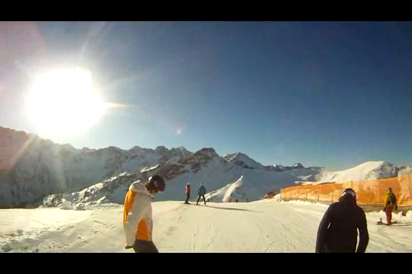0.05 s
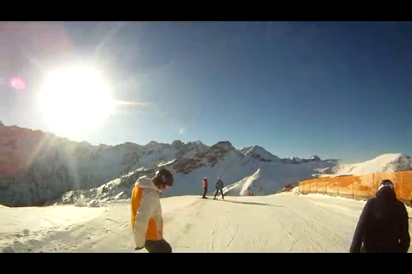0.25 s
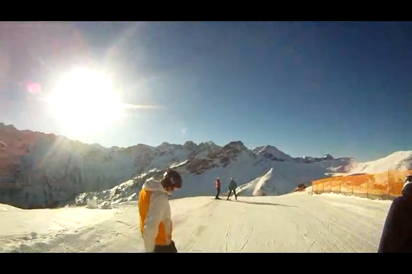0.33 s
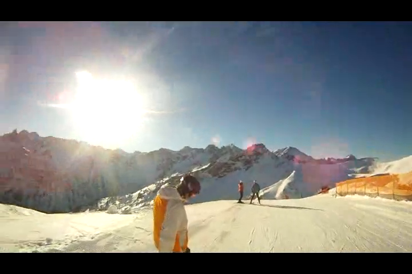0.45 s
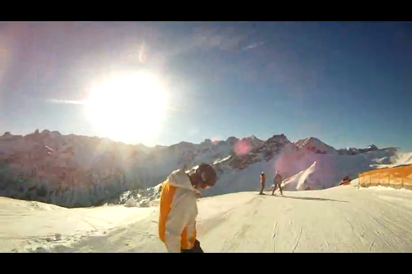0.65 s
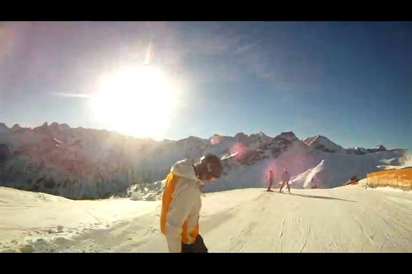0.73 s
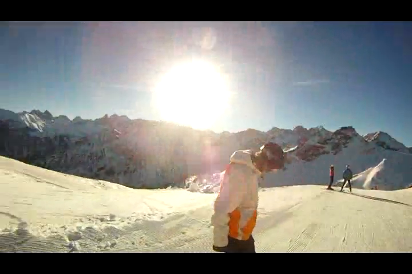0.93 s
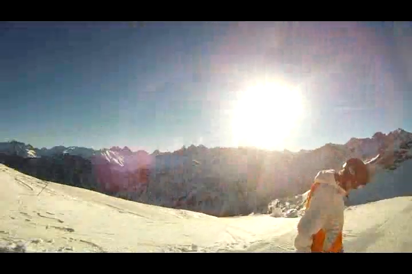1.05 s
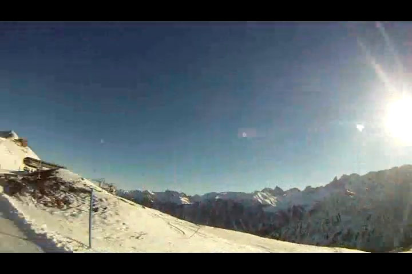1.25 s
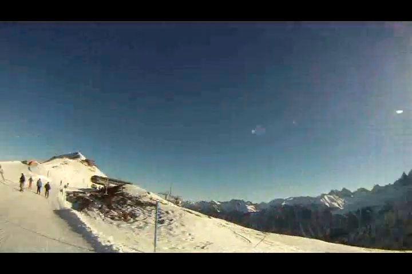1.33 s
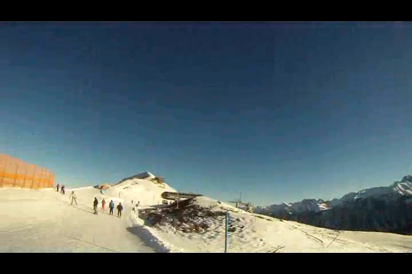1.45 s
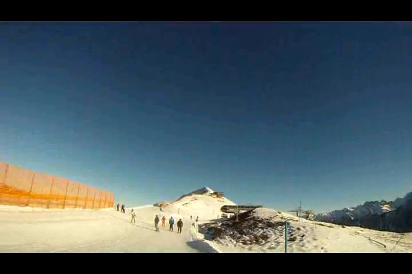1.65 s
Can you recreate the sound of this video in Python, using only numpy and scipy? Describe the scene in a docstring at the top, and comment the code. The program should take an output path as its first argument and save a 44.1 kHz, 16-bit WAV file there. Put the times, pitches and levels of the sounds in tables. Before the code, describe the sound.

Skis glide over packed snow with an uneven, grainy hiss. Gear knocks hard against the body-worn microphone twice, about a second apart, with a few light taps, while low wind gusts buffet it.

```python
"""On packed snow, skis glide along, heard from a small body-worn camera.
Friction and breaking crystals make a grainy hiss that excites the resonances of the plastic case.
Twice the gear knocks hard against the camera, a dull thump and then a crack; it also taps lightly.
Wind buffets the case. The recorder holds coarse samples and clips when it is overloaded."""
import sys
import numpy as np
from scipy import signal
from scipy.io import wavfile
from scipy.ndimage import uniform_filter1d

SR = 44100
rng = np.random.default_rng(int(sys.argv[2]) if len(sys.argv) > 2 else 0)


def file_out(sig):
    """Save sig as 16-bit WAV at sys.argv[1]."""
    # one column per channel
    cols = np.atleast_2d(sig).T
    # limit, then scale
    lim = np.clip(cols, -1, 1)
    pcm = np.round(lim * 32767).astype(np.int16)
    wavfile.write(sys.argv[1], SR, pcm)


N = 74970

# The course of the glide. Each row: time in seconds, then the relative levels in dB of the low middle,
# the case ring, the hiss and the thin upper ring.
GLIDE_LEVELS = [(0, -46, -38.5, -50.5, -55.5), (0.13, -43, -37, -44.5, -57), (0.2, -43, -28.5, -37.5, -53),
                (0.26, -41.5, -32.5, -41, -50), (0.32, -46, -39.5, -46.5, -54),
                (0.47, -43, -36.5, -45.5, -49.5), (0.56, -47.5, -37.5, -46, -51.5),
                (0.635, -49, -47, -53.5, -66), (0.73, -38.5, -35, -44.5, -60), (0.86, -40.5, -40, -45, -55),
                (0.91, -39.5, -40.5, -45, -61), (1.0, -39.5, -34.5, -42, -51.5),
                (1.08, -47.5, -42.5, -47, -67), (1.19, -34.5, -35, -38.5, -53),
                (1.24, -48.5, -42.5, -50, -67), (1.27, -46.5, -41, -48.5, -66),
                (1.325, -52.5, -48, -54.5, -71), (1.385, -46.5, -39.5, -48.5, -64),
                (1.42, -52.5, -51.5, -55.5, -68), (1.455, -51.5, -52.5, -53.5, -77),
                (1.54, -52, -42.5, -48, -68), (1.6, -54.5, -52, -57.5, -66.5),
                (1.69, -50.5, -52.5, -57.5, -62.5)]
# Resonances of the case, in four groups. Each row: frequency in Hz, bandwidth in Hz, relative gain in dB.
LOW_MODES = [(259, 137, 3.5), (440, 78, -6.5), (707, 210, -4.5), (901, 83, 1), (1307, 90, -13.5)]
CASE_MODES = [(1595, 59, 0), (2008, 218, 6.5)]
HISS_MODES = [(2650, 610, -0.5), (3230, 620, 5), (4630, 970, -12)]
UPPER_MODES = [(5350, 460, 0)]


def skis():
    """Source and filter: snow noise is heard as a broad slide and through the resonances of the case."""
    low_db, case_db, hiss_db, upper_db = in_time(GLIDE_LEVELS)
    slide = rms_one(filtered(snow(), [115, 1230], "band"))
    return (from_db(low_db - 6) * slide
            + from_db(low_db - 3) * resonate(snow(), LOW_MODES)
            + from_db(case_db - 0.5) * resonate(snow(), CASE_MODES)
            + from_db(hiss_db) * resonate(snow(), HISS_MODES)
            + from_db(upper_db + 3) * resonate(snow(), UPPER_MODES))


def snow(grains_per_s=2500, grain_spread_db=3.5, grain_db=-4.5):
    """Friction noise plus the shot noise of breaking crystals, both modulated by uneven pressure."""
    breaks = rng.random(N) < grains_per_s / SR
    strength = from_db(grain_spread_db * np.minimum(rng.exponential(1, N), 4))
    grains = breaks * strength * rng.choice([-1, 1], N)
    friction = rng.standard_normal(N)
    pressure_db = rms_one(filtered(rng.standard_normal(N + SR), 30, "low")[SR:])
    return (friction + from_db(grain_db) * rms_one(grains)) * from_db(pressure_db)


# Hard knocks of the gear; levels are relative, and t60 is the time to decay by 60 dB.
# Each row: thump start in seconds, level in dB, rise and base t60 in seconds; crack start in seconds;
# crack, clack and second thump levels in dB; ring frequency in Hz, level in dB and t60 in seconds;
# hollow after-ring frequency in Hz and level in dB.
IMPACTS = [(0.2087, 4, 0.002, 0.043, .2182, 1, -14.5, -3.5, 2132, 7, 0.022, 872, -10.5),
           (1.1442, 8, 0.0026, 0.024, 1.1510, -7.5, -6.5, -12.5, 2030, 2.5, 0.037, 995, -18)]
# Dull modes of the mount. Each row: frequency in Hz, relative level in dB, multiple of the base t60.
MOUNT_MODES = [(97, -13, 0.27), (160.5, -11.5, 1.27), (248, -2.5, 0.93), (311.1, -6, 1.28),
               (389, -9.5, 1.22), (447, -17.5, 1.34), (806, -15, 1.83), (1336, -34, 0.73), (1584, -9, 1.28),
               (3586, -6, 0.98)]


def knocks(crack_rise_s=0.00017):
    """Impacts excite damped modes: the mount thumps and scuffs, then the case cracks and rings."""
    out = 0
    for (thump_s, thump_db, rise_s, thump_t60, crack_s, crack_db, clack_db, second_db,
         ring_hz, ring_db, ring_t60, hollow_hz, hollow_db) in IMPACTS:
        for hz, mode_db, multiple in MOUNT_MODES:
            t60 = multiple * thump_t60
            rolloff = np.hypot(1, hz / 500)   # a soft contact drives high modes weakly
            soft = from_db(thump_db) * ring(thump_s, hz, t60, rise_s) / rolloff
            hard = from_db(second_db) * ring(crack_s, hz, t60, crack_rise_s)
            out += from_db(mode_db) * (hard - soft)
        scuff = from_db(thump_db - 14) * burst(thump_s, t60=0.054, band_hz=[94, 3200], rise=rise_s)
        padding = from_db(thump_db - 12) * burst(thump_s, t60=0.055, band_hz=[76.4, 400], rise=rise_s)
        crack = from_db(crack_db) * burst(crack_s, t60=0.018, band_hz=[1760, 5840])
        woody_clack = from_db(clack_db) * burst(crack_s, t60=0.043, band_hz=[872, 1944])
        case_ring = from_db(ring_db) * ring(crack_s, ring_hz, ring_t60, crack_rise_s)
        after_ring = from_db(hollow_db) * ring(crack_s, hollow_hz, t60=0.062, rise=rise_s)
        out += scuff + padding + crack + woody_clack + case_ring + after_ring
    return out


# Light taps of the gear. Each row: start in seconds, relative levels in dB of the low middle,
# the case ring and the hiss, then t60 in seconds.
TAPS = [(.0865, -18.5, -25.5, -28.5, 0.03), (0.105, -30, -28.5, -27, 0.028),
        (1.1696, -19, -20, -19.5, 0.022), (1.252, -52, -27.5, -39, 0.024), (1.355, -47, -30, -54, 0.016),
        (1.432, -42, -30.5, -54, 0.013), (1.469, -41, -38.5, -39, 0.034)]


def ticks(rise_s=0.0008):
    """Free vibration: each tap leaves the case ringing at its natural frequencies, with a puff of hiss."""
    out = 0
    for start, low_db, case_db, hiss_db, t60 in TAPS:
        for level_db, modes in ((low_db, LOW_MODES[1:]), (case_db, CASE_MODES)):
            for hz, _, mode_db in modes:
                out += from_db(level_db + mode_db) * ring(start, hz, t60, rise_s)
        hiss = resonate(rng.standard_normal(N), HISS_MODES)
        out += from_db(hiss_db) * decay(start, t60, rise_s) * hiss
    return out


# Gusts on the case. Each row: time in seconds, level in dB.
GUSTS = [(0, -34), (.3, -32.5), (.58, -26.5), (.67, -32.5), (.78, -21.5), (.88, -23.5), (1.0, -36),
         (1.08, -30), (1.27, -28.5), (1.34, -36), (1.42, -21), (1.52, -37.5), (1.7, -31)]


def wind(rush_db=-52.5):
    """Turbulent pressure: deep buffeting follows the gusts, over a faint steady rush of air."""
    gust_db, = in_time(GUSTS)
    buffet = filtered(rng.standard_normal(N + SR), [19.9, 51.9], "band")
    buffet = filtered(buffet, 79.3, "low", order=6)[SR:]
    running_rms = np.sqrt(uniform_filter1d(buffet ** 2, size=4000))
    rush = rms_one(filtered(rng.standard_normal(N), [93, 370], "band"))
    return from_db(gust_db) * buffet / running_rms + from_db(rush_db) * rush


def resonate(x, modes):
    """Forced vibration: parallel resonators add, with steep skirts beyond the outer two; unit rms."""
    out = 0
    for hz, width_hz, db in modes:
        radius = np.exp(-np.pi * width_hz / SR)
        feedback = [1, -2 * radius * np.cos(2 * np.pi * hz / SR), radius ** 2]
        out += from_db(db) * (1 - radius ** 2) / 2 * signal.lfilter([1, 0, -1], feedback, x)
    edges_hz = [0.87 * modes[0][0], 1.2 * modes[-1][0]]
    return rms_one(filtered(out, edges_hz, "band", order=4))


def ring(start, hz, t60, rise):
    """A struck mode vibrates as a damped sinusoid."""
    return decay(start, t60, rise) * np.sin(2 * np.pi * hz * (np.arange(N) / SR - start))


def burst(start, t60, band_hz, rise=1e-4):
    """A transient without pitch is a damped band of noise."""
    return decay(start, t60, rise) * rms_one(filtered(rng.standard_normal(N), band_hz, "band", order=3))


def decay(start, t60, rise):
    """Exponential damping: after a rounded rise, the level falls 60 dB every t60 seconds."""
    age = np.maximum(np.arange(N) / SR - start, 0)
    return (1 - np.exp(-age / rise)) ** 2 * from_db(-60 * age / t60)


def from_db(db):
    """Amplitude grows tenfold for every 20 dB."""
    return 10 ** (np.asarray(db) / 20)


def rms_one(x):
    """Normalisation to unit rms."""
    return x / np.sqrt(np.mean(x ** 2) + 1e-20)


def in_time(rows):
    """Linear interpolation gives each level column a value at every sample."""
    times, *columns = np.transpose(rows)
    return [np.interp(np.arange(N) / SR, times, column) for column in columns]


def filtered(x, hz, kind, order=2):
    """Butterworth filtering, with a maximally flat passband."""
    return signal.sosfilt(signal.butter(order, hz, kind, fs=SR, output="sos"), x)


def scene():
    """Superposition: the sources add at one microphone."""
    return (skis() + wind() + knocks() + ticks())[None]


def record(dry, overload=0.86, cutoff_hz=15500):
    """Sample and hold at 12 kHz mirrors the spectrum into the treble; peaks clip and the top is cut."""
    band_limited = filtered(dry, 5495, "low", order=12)
    at_48_khz = signal.resample_poly(band_limited, 160, 147, axis=1)
    held = np.repeat(at_48_khz[:, ::4], 4, axis=1)
    stepped = signal.resample_poly(held, 147, 160, axis=1)[:, :N]
    clipped = np.clip(stepped, -overload, overload)
    return signal.sosfilt(signal.ellip(14, .1, 80, cutoff_hz, fs=SR, output="sos"), clipped)


dry = scene()
out = record(dry)
file_out(out)
```